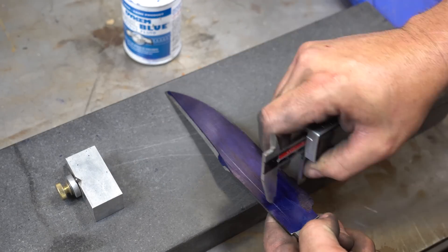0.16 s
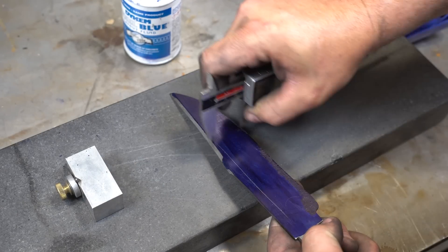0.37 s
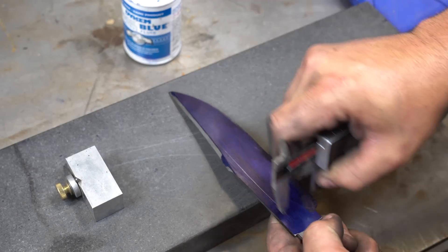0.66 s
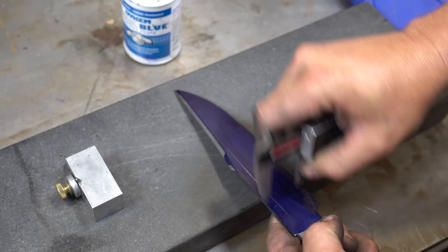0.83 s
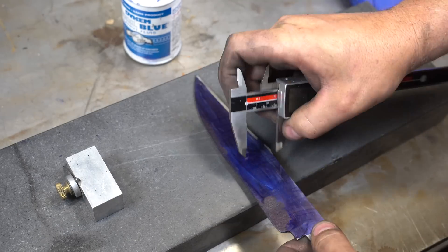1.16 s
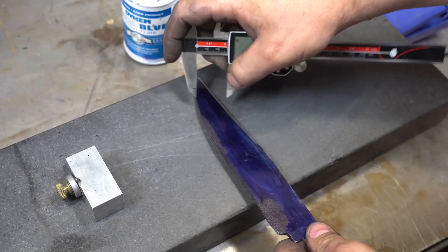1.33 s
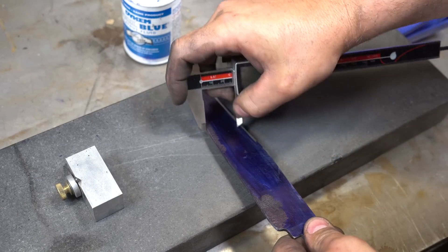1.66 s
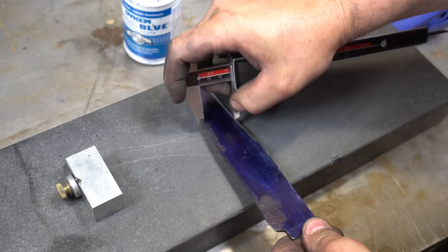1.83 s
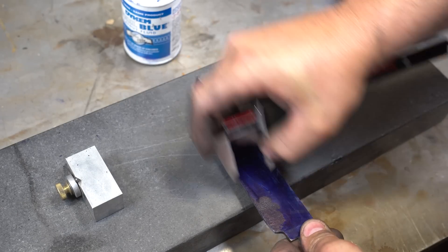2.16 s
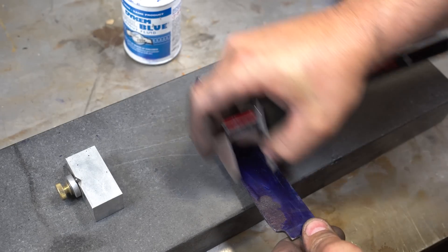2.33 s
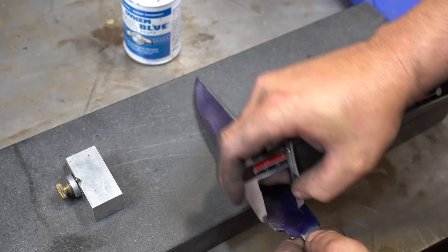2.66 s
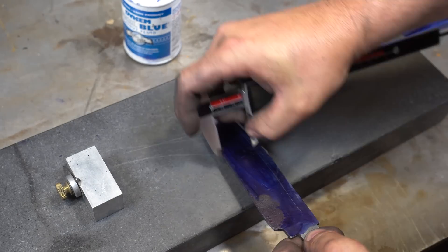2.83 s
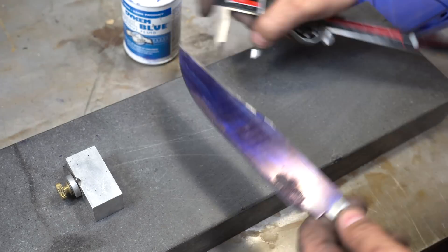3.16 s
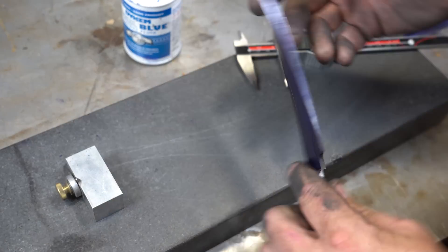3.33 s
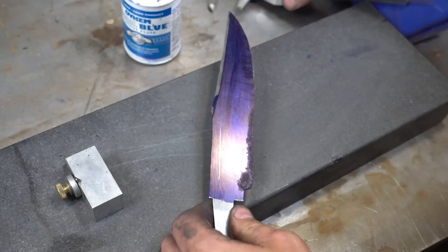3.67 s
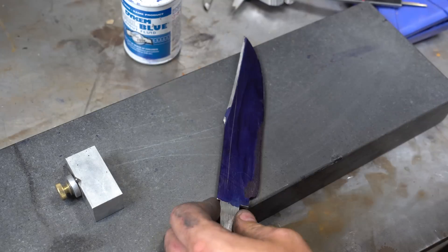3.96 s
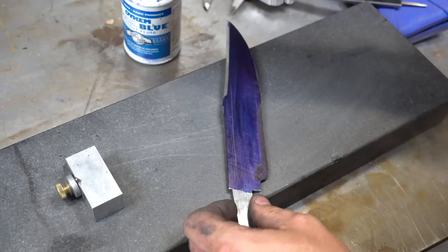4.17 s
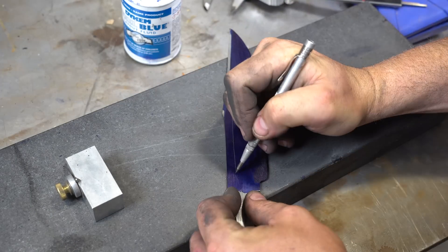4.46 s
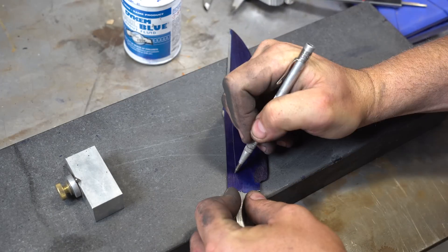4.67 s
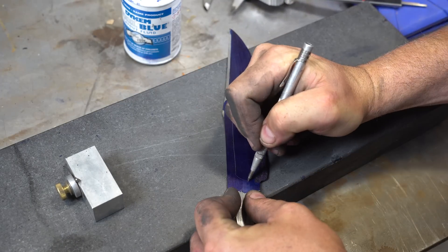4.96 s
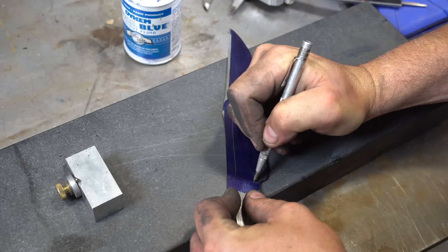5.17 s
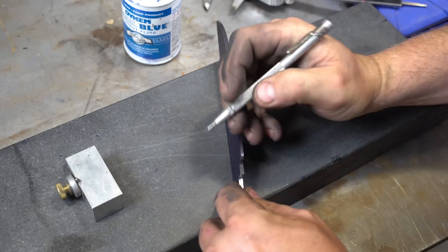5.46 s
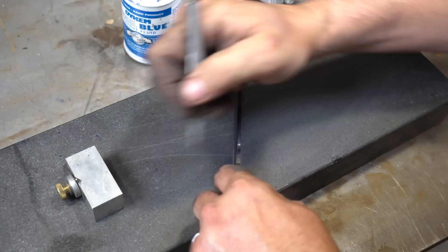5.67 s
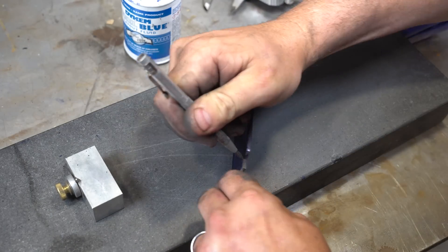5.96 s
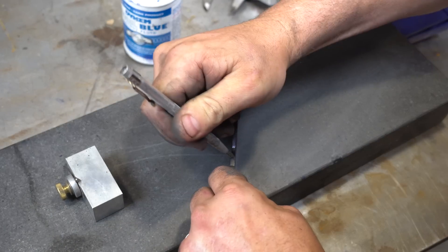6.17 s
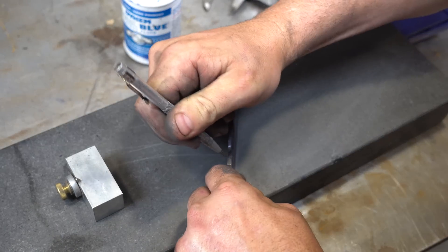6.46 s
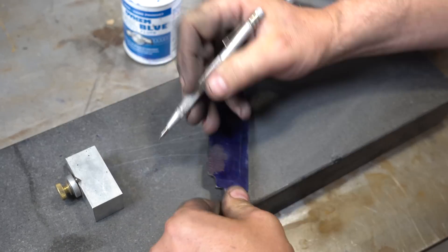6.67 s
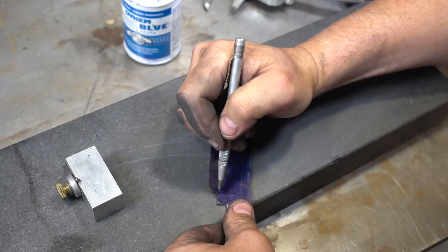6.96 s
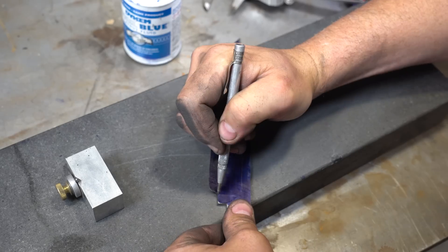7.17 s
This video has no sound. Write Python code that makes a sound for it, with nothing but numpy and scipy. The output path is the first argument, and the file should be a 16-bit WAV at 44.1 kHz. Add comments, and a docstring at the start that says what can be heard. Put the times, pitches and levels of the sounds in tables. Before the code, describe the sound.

Dry, bright metal scratching in quick back-and-forth runs, then clinks, a hard blade slap on stone, short scrapes and sharp steel ticks over a faint fan.

```python
"""Quick runs of dry scratching, clinks and a hard slap, over the steady whir of a workshop fan.
Close to the microphone pair, a little right of centre, a caliper jaw scratches a dyed knife blade on a stone
plate: tiny random slips drive resonances. The caliper is put down, the blade is laid flat and slid about, and
a steel scribe pricks and taps it: bursts of noise with dying modes. Near the end a distant motor swells,
made of wavering tones and a soft rush of noise."""
import sys
import numpy as np
from scipy import signal
from scipy.fft import rfft, irfft
from scipy.io import wavfile
from scipy.ndimage import uniform_filter1d

SR = 44100
rng = np.random.default_rng(int(sys.argv[2]) if len(sys.argv) > 2 else 0)


def to_wav(s):
    """Save 16-bit WAV."""
    ch = np.atleast_2d(s).T  # columns
    pcm = np.round(np.clip(ch, -1, 1) * 32767)  # PCM
    wavfile.write(sys.argv[1], SR, pcm.astype(np.int16))


N = 321930
TIME = np.arange(N) / SR

# The shop, at a distance.
# fan noise, shape only: (frequency [Hz], density [dB per Hz])
FAN_SPECTRUM = [(30, -52), (60, -47), (110, -33.5), (200, -34.5), (310, -31), (450, -22.5), (750, -22),
                (1050, -12.5), (1500, -10.5), (2400, 2), (3500, -5.5), (5500, -9.5), (7500, -11.5),
                (11000, -14), (16000, -18)]
FAN_DB = -63  # rms of the fan noise
# hum of the fan: (frequency [Hz], mean level [dB])
FAN_TONES = [(120, -119), (248.5, -99), (479.5, -86), (958, -101)]
# fuzzy whistles of the fan: (frequency [Hz], width of each of two passes [Hz], level [dB])
FAN_WHISTLES = [(2472, 29, -72), (2983, 62, -79.5), (5880, 1300, -74)]
# overall level of the distant motor: (time [s], level [dB])
MOTOR_LEVEL = [(6.5, -105), (6.8, -76), (7.0, -74.5), (7.14, -74), (7.22, -70), (7.3, -68.5)]
# tones of the motor: (multiple of its hum [-], relative level idling [dB], relative level under load [dB])
MOTOR_ORDERS = [(3, -20.5, -12), (4, -15, -19), (5, -6, -3.5), (8, -39, -9), (10, 0.5, -7),
                (11.2, -4.5, -3), (13, -35, -8), (15, -6, 4)]
# soft rush around the motor, shape only: (frequency [Hz], level [dB])
MOTOR_RUSH = [(40, -35), (120, -20), (250, -64), (450, 0.5), (750, -9), (1200, 0), (2000, 5), (3500, -17),
              (9000, -12), (16000, -34)]
LOAD_S, LOAD_RISE_S = 7.13, 0.13
# decay of the shop's tail: (frequency [Hz], t60 [s])
ROOM_DECAY = [(200, 0.054), (1500, 0.7), (6000, 0.23), (15000, 0.021)]

# The microphone pair and the place of the work.
# shop sound, from all sides: (frequency [Hz], left-right correlation [-])
FAR_LIKENESS = [(60, 0.58), (200, .98), (400, 0.96), (700, 0.93), (1300, 0.74), (2400, 0.75), (4400, 0.13),
                (15000, 0.16)]
# work sound, close by: (frequency [Hz], left-right correlation [-])
NEAR_LIKENESS = [(100, 0.94), (500, .997), (1000, 1), (2200, 1), (4000, 0.8), (8000, 0.67), (14000, 0.67)]
# the work lies to the right: (frequency [Hz], right minus left [dB])
RIGHTWARD = [(1500, -2), (2500, 1), (5000, 0), (10000, 2.5), (16000, 2.5)]
EDGE_HZ = 15900  # upper edge of the recorder's band

# Blows, all as (time [s], level before the group's gain [dB], treble relative to level [dB],
# body relative to level [dB], t60 of the crack [s]); fingers on the thing shorten the crack.
# scribe and blade clink; columns as above
STEEL_TAPS = [(.7669, -38.5, 5, -38, 0.015), (.7971, -37, -7, -41, 0.016), (1.0609, -38.5, 5, -12, 0.019),
              (1.0675, -40.5, -14, -13.5, 0.066), (3.8538, -36.5, 2, -21.5, 0.015),
              (5.3997, -34.5, -2.5, -24, 0.027), (6.5489, -53, -14, -12, 0.064),
              (6.7085, -32, 1, -17, 0.018), (6.7731, -34.5, -3, -23, 0.0091),
              (6.826, -52.5, -4, -13, 0.051), (6.9251, -41.5, 2, -28, 0.016)]
# the blade is rolled up on its edge; columns as above
EDGE_KNOCKS = [(5.5761, -40.5, -21, -16.5, 0.011), (5.618, -50.5, -13, -5.5, 0.025),
               (5.6466, -38, -11.5, -15.5, 0.028), (5.6585, -47, -12, -10, 0.071),
               (5.6898, -46, -23, -8, 0.0074)]
# the caliper slips off and lands; columns as above
CALIPER_KNOCKS = [(.3028, -54, 9, -4.5, 0.032), (.9675, -63, 2, -25, .03), (1.188, -59.5, 2, -31, 0.049),
                  (1.4368, -53.5, 3, -6.5, 0.036), (3.097, -46, 11, -4, 0.015),
                  (3.1005, -33, -7, -19.5, 0.0093), (3.1041, -37, -12, -11, 0.1),
                  (3.1262, -44, 5.5, -8.5, 0.036), (3.2476, -42, 2, -15, 0.014),
                  (3.2571, -35.5, 8, -17.5, 0.0054), (3.2648, -46, -5, -3.5, 0.086),
                  (3.274, -36, 5, -14, 0.012), (3.281, -46, 4, -11, 0.15), (3.314, -36, 9, -12.5, 0.011),
                  (3.3201, -40, 3, -1, 0.037), (3.329, -43, -2, -4, 0.021), (3.3347, -35.5, 5.5, -8, 0.073),
                  (3.364, -45.5, 2.5, -18, .016), (3.381, -55.5, -7, 0.5, 0.053),
                  (3.5575, -58.5, 13, 2, .012), (3.5695, -53.5, 17.5, -10, 0.018),
                  (3.584, -53, -0.5, -7.5, 0.36), (3.595, -61, 19, -1, 0.037)]
# the blade slaps on the stone and settles; columns as above
BLADE_DROPS = [(3.6952, -17.5, -2.5, -9, 0.027), (3.7056, -10.5, -4.5, -14, 0.027),
               (3.717, -31, 1, -5, 0.08), (3.728, -31, 1, -6, 0.065), (3.739, -28.5, -10, -20, 0.032),
               (3.7575, -38, -1, -10, 0.042), (3.9327, -35, -4, -13, 0.034), (4.0856, -52, 6, -19, 0.029)]
# the scribe's point catches and jumps; columns as above
POINT_SLIPS = [(4.695, -57, -12, -23, 0.019), (5.096, -54, -1, -27, 0.025), (5.109, -46, -3, -13.5, .02),
               (5.116, -36.5, -6, -18.5, 0.042), (5.211, -62, -10, -13, .015),
               (5.221, -45.5, 0, -18.5, 0.062), (5.2275, -41.5, -5, -22, 0.025)]
POINT_THUD_DB = -1.5  # the full weight of the hand comes down behind the point
HARD_BLOW_DB, THUD_GROWTH = -39.5, 0.38  # a softer blow loses its thud by so many dB per dB
# uneven ticks, as the blade is rolled on edge and the scribe feels for its place:
# (start [s], end [s], count [-], mean level before gain [dB], treble relative to level [dB])
RATTLES = [(5.584, 5.734, 24, -59.5, -13), (6.327, 6.479, 9, -58.5, -11)]
# the jaw springs off the blade's edge: (time [s], level of the ping [dB], pitch [Hz])
JAW_SNAPS = [(3.1009, -14.5, 12900), (3.1035, -11, 8480)]
SNAP_RISE_S, SNAP_RING_DB, SNAP_RING_T60 = 0.00027, -7, 0.018

# Modes of the things struck, all as (frequency [Hz], relative level [dB], t60 [s]).
# scribe and blade in the hand; columns as above
STEEL_MODES = [(1230, -5.5, 0.066), (4120, 4, 0.055), (4480, 0, 0.04), (5230, 0, 0.04), (6750, 7, 0.06),
               (7800, 3, .06), (8600, 4, .06), (10420, 8, 0.045), (12700, 8, 0.035), (14200, -3, 0.022)]
# blade on its edge; columns as above
EDGE_MODES = [(1223, -10, 0.39), (1970, 1, 0.083), (2750, -17, 0.044), (3814, 3, 0.088), (4210, 9, 0.054),
              (4440, 0, 0.023), (5210, 7, 0.029), (6450, -7, 0.059), (8300, -14, 0.039), (10200, 2, 0.042)]
# caliper as it is knocked; columns as above
CALIPER_MODES = [(1170, -7, .05), (1380, -1, .06), (1650, -7, .05), (1980, -4, .05), (2850, -8, .04),
                 (3650, -9, .04), (4140, 0, .07), (7300, 2, .07), (7750, 0, .06), (8400, -5, .03),
                 (10300, -3, .06), (11450, -2, .04), (12600, -1, .03), (13350, -2, .06), (14400, -3, .03)]
# frame of the caliper on its back; columns as above
FRAME_MODES = [(470, -18, .04), (1380, -2, .04), (1650, -8, .03), (2900, -12, .02), (7330, 0, .035),
               (7750, -3, .03), (10200, -9, .03), (13400, -8, .03)]
# blade flat on the stone; columns as above
FLAT_BLADE_MODES = [(1120, -3, .08), (1400, -5, .07), (1680, -5, .06), (2150, -2, .05), (2800, 0, .06),
                    (3075, 0, .07), (3930, 1, .07), (4430, -3, .07), (5280, -3, .09), (5650, -1, .08),
                    (6050, -2, .1), (6345, -4, .12), (8780, -6, .06)]
# scribe's point; columns as above
POINT_MODES = [(1520, -8, 0.055), (4180, -7, 0.045), (7060, 10.5, 0.012), (7880, 5.5, 0.015),
               (8720, 9.5, 0.015), (10300, 0, 0.028)]
# bench below; columns as above
BENCH_MODES = [(257, -4.5, 0.48), (448.2, 20, 0.19), (620, 18.5, 0.086)]
# stone plate; columns as above
PLATE_MODES = [(462, 13, 0.17), (615, 23, 0.089), (677, 24, 0.076)]
ROCK_START_S, ROCK_S, ROCK_DB = 3.409, 0.028, -48.5  # first touch, spacing, level of the first touch

# shoves of the blade over the stone: (start [s], length [s], level [dB], relative speed [-])
SHOVES = [(3.919, 0.054, -47.5, 0.76), (3.965, 0.026, -46, 0.69), (4.002, 0.054, -47, 0.75),
          (4.075, 0.011, -48, 0.95), (4.128, 0.033, -46.5, 1.04), (4.202, 0.021, -41, 1.9),
          (4.264, 0.03, -47, 0.63), (4.325, 0.018, -39, 1.4)]
SHOVE_ATTACK_S, SHOVE_RELEASE_DB_PER_S = 0.024, 490
# scrape of stone grains and dye flakes, shape only: (frequency [Hz], level [dB])
GRIT_SPECTRUM = [(60, -81), (300, -69), (900, -48), (1600, -18.5), (2900, 3), (4600, 2), (6500, -2),
                 (8500, -1), (12000, 3.5), (16000, 0)]

# hiss of the jaw, shape only: (frequency [Hz], level [dB])
JAW_SPECTRUM = [(300, -80), (900, -63.5), (1500, -5.5), (2000, -8.5), (3300, -7.5), (5200, -10.5),
                (6300, -13.5), (7100, 0), (7700, -7.5), (8700, 2), (10500, -2.5), (12500, 6), (14800, 4),
                (16000, -0.5)]
# resonances of the blade under the jaw: (frequency [Hz], width of each of two passes [Hz], level [dB])
BLADE_RESONANCES = [(2900, 600, 8), (3650, 400, 7), (4130, 330, 13.5), (6030, 380, 11), (7150, 650, 16.5),
                    (8250, 1500, 13.5), (10420, 720, 10), (12600, 700, 11), (15200, 400, 11)]
# how freely the blade rings under the jaw: (time [s], ring relative to the hiss [dB])
CONTACT = [(.28, -5.5), (.56, -11), (.64, -4), (.75, 9), (.835, 0), (1.45, -29), (2.1, -12.5), (2.65, -4),
           (3.05, -13.5)]
# runs of the jaw, to and fro: (start [s], end [s], strokes [-], slowing (below 0: hurrying) [-],
# first stroke [dB], last stroke [dB], chatter of the last pull [dB], base chatter pitch [Hz])
RUNS = [(0.097, 0.297, 2, -0.013, -39.5, -35.5, -54.5, 1820),
        (0.392, 0.537, 4, -0.12, -54.5, -49, -49, 1690), (0.658, 0.813, 5, 0.044, -45, -35.5, -47, 3350),
        (1.735, 2.448, 18, 0.14, -49, -35.5, -45.5, 1610), (2.494, 2.794, 7, -0.26, -35, -38, -52, 1700),
        (2.914, 3.11, 2, 0.36, -37, -39, -50.5, 1630)]
# single pulls of the jaw, and at 1.21 s a faint rub of the hand made the same way: (start [s], length before
# lingering [s], hiss [dB], chatter [dB], base chatter pitch [Hz])
PULLS = [(-.02, 0.065, -35, -50.5, 1760), (.25, 0.083, -54.5, -52.5, 1790), (.375, 0.026, -54.5, -77, 1600),
         (.527, 0.11, -44, -53, 1690), (.585, 0.075, -43, -48.5, 3000), (.819, 0.035, -20, -47, 1260),
         (.852, 0.016, -29.5, -49, 1160), (1.21, 0.094, -65, -74, 1130), (1.442, 0.059, -54, -56, 1410),
         (1.621, 0.038, -47.5, -55.5, 1590), (1.675, 0.05, -61, -69, 1600),
         (2.804, 0.083, -38.5, -53, 2400)]
MOVING_SHARE = 0.93  # of each stroke, before lingering; for the rest the hand is turning round
SETTLING = 3.3  # power law by which the pressure settles over a run
CHATTER_GROWTH = 0.53  # dB of chatter per dB of hiss
RETURN_HISS_DB, RETURN_CHATTER_DB = -1.5, -14  # on the way back the jaw trails: lighter and much smoother
SIZZLE_HZ, SIZZLE_HZ_PER_S = 11340, 1630  # the sizzle creeps up as the work goes on
STEEP_HZ = 2200  # a steeply held jaw chatters above this pitch, and more broadly
# widths of the chatter, each pass: (jaw held flat [Hz], held steeply [Hz])
CHATTER_WIDTHS_HZ = (640, 1500)


def amp(db):
    """Amplitude factor of a level in dB."""
    return 10 ** (np.asarray(db) / 20)


def unit(x):
    """Scales a signal to rms 1."""
    return x / np.sqrt(np.mean(x ** 2) + 1e-24)


def read(points, hz):
    """Reads a (frequency, value) table along a logarithmic frequency axis."""
    f, value = np.transpose(points)
    return np.interp(np.log(hz + 1), np.log(f + 1), value)


def curve(rows):
    """Draws each column of a table as straight lines over time."""
    s, *columns = np.transpose(rows)
    return [np.interp(TIME, s, c) for c in columns]


def add(mix, s, sound):
    """Mixes a sound in at time s; one that began earlier is joined part-way."""
    sound = sound[..., max(-round(s * SR), 0):]
    part = mix[..., max(round(s * SR), 0):][..., :sound.shape[-1]]
    part += sound[..., :part.shape[-1]]


def colour(x, points):
    """Filters by a spectrum of (Hz, dB) points."""
    n = x.shape[-1]
    gain = amp(read(points, np.fft.rfftfreq(n, 1 / SR)))
    return irfft(rfft(x) * gain, n)


def wander(rate_hz):
    """Smooth random drift of rms 1: noise low-passed near rate_hz."""
    n = 2 ** 14
    hz = np.fft.rfftfreq(n, N / SR / n)
    slow = irfft(rfft(rng.standard_normal(n)) / (1 + (hz / rate_hz) ** 4), n)
    return unit(np.interp(TIME, np.linspace(0, N / SR, n), slow))


def microphone_pair(pair, likeness=NEAR_LIKENESS):
    """Gives two unrelated signals the left-right correlation of a sound at a microphone pair."""
    n = pair.shape[-1]
    same = np.clip(read(likeness, np.fft.rfftfreq(n, 1 / SR)), 0, 1)
    mid, side = rfft(pair) * np.sqrt([(1 + same) / 2, (1 - same) / 2])
    return irfft([mid + side, mid - side], n)


def resonate(x, hz, width):
    """A resonance, of gain 1 at its centre, that can follow a pitch curve."""
    turn = np.exp(2j * np.pi * np.cumsum(hz * np.ones(N)) / SR)
    r = np.exp(-np.pi * width / SR)
    return 2 * (turn * signal.lfilter([1 - r], [1, -r], x / turn)).real


def band_ring(x, hz, width):
    """A resonance passed twice for steep skirts."""
    return resonate(resonate(x, hz, width), hz, width)


def fan():
    """Steady air noise with a low hum and a few fuzzy whistles, from all sides."""
    noise = microphone_pair(rng.standard_normal((2, N)), FAR_LIKENESS)
    out = amp(FAN_DB) * unit(colour(noise, FAN_SPECTRUM))
    for hz, db in FAN_TONES:
        tone = np.sin(2 * np.pi * hz * TIME + 0.35 * wander(1.9))
        out += amp(db + 1.2 * wander(10.0)) * unit(tone)
    draught = microphone_pair(rng.standard_normal((2, N)), FAR_LIKENESS)
    for hz, width, db in FAN_WHISTLES:
        out += amp(db) * unit(band_ring(draught, hz, width))
    return out


def motor(hum_hz=112.6, rush_db=6):
    """A far machine in a soft rush: it idles, then takes load, and other multiples of its hum come forward."""
    load = np.clip((TIME - LOAD_S) / LOAD_RISE_S, 0, 1)
    lines = np.zeros(N)
    for k, idle_db, load_db in MOTOR_ORDERS:
        tone = np.sin(2 * np.pi * k * hum_hz * TIME + 0.08 * k * wander(12))
        lines += amp(idle_db + (load_db - idle_db) * load + 2.5 * wander(15)) * unit(tone)
    noise = microphone_pair(rng.standard_normal((2, N)), FAR_LIKENESS)
    rush = amp(rush_db) * unit(colour(noise, MOTOR_RUSH))
    return amp(curve(MOTOR_LEVEL)[0]) * (lines + rush)


def room(x, near_db=-13, near_t60=0.18, far_db=-21):
    """Quick reflections from plate, hands and bench, then the faint tail of the shop, as decaying noise."""
    noise = microphone_pair(rng.standard_normal((2, SR // 2)), FAR_LIKENESS)
    hz, t, z = signal.stft(noise, SR, nperseg=256)
    far = signal.istft(z * amp(-60 * t / read(ROOM_DECAY, hz)[:, None]), SR, nperseg=256)[1]
    t = np.arange(far.shape[1]) / SR
    near = microphone_pair(rng.standard_normal(far.shape)) * amp(-60 * t / near_t60) * (t > .002)
    echo = amp(near_db) * unit(near) + amp(far_db) * unit(far * (t > .01))
    return signal.fftconvolve(x, echo / np.sqrt(len(t)), axes=1)[:, :N]


def ringing(modes, t, loose_db=2.0, split=0.026, count=8, crowd_hz=50):
    """Dying modes, each a close cluster; every blow lands elsewhere and so weighs them anew."""
    hz, db, t60 = np.repeat(modes, count, 0).T[:, :, None]
    phase, weight, detune, left, right = rng.standard_normal((5, len(hz), 1))
    mode_hz = hz + (split * hz + crowd_hz) * detune
    decay = amp(db + loose_db * weight - 60 * t / t60)
    waves = decay * np.exp(2j * np.pi * (mode_hz * t + phase))
    skew = np.array([left, right]) * hz / 22000  # treble reaches the two microphones out of step
    return (np.exp(1j * skew[..., 0]) @ waves).real / np.sqrt(count)


def early(x, lo_hz, hi_hz, seconds):
    """One band of a blow, both channels scaled so that their mean has rms 1 over its first moments."""
    band = signal.butter(3, [lo_hz, min(hi_hz, .49 * SR)], "band", fs=SR, output="sos")
    x = signal.sosfilt(band, x)
    return x / np.sqrt(np.mean(x.mean(0)[:round(seconds * SR)] ** 2) + 1e-24)


def blows(rows, modes, ring_db, gain_db, clink_hz, snap_db, thud_db, base=BENCH_MODES, push_db=-50,
          thud_t60=0.0096, snap_t60=0.0028):
    """A snap and short crack of contact, the modes of the thing struck, and a thud in the base below."""
    out, t = np.zeros((2, N)), np.arange(SR // 6) / SR
    for s, level_db, treble_db, body_db, crack_t60 in rows:
        noise = microphone_pair(rng.standard_normal((2, len(t))))
        contact = noise * (amp(-60 * t / crack_t60) + amp(snap_db - 60 * t / snap_t60))
        blow = contact + amp(ring_db) * ringing(modes, t)
        thud = ringing(base, t, loose_db=1, crowd_hz=4, count=1)
        thud = thud + 12 * noise * amp(-60 * t / thud_t60)
        softness_db = THUD_GROWTH * min(level_db + body_db - HARD_BLOW_DB, 0)
        clink = early(blow, clink_hz, 9000, .006) + amp(treble_db) * early(blow, 9000, 16000, .006)
        body = early(blow, 900, 3000, .008)
        body += amp(thud_db + softness_db) * early(thud, 200, 800, .016)
        body += amp(push_db) * early(thud, 25, 90, .016)
        add(out, s, amp(level_db + gain_db) * (clink + amp(body_db) * body))
    return out


def rattling(spread_db=3.0, body_db=-16, t60=0.044):
    """Rows for blows(): faint steel ticks at uneven moments and of uneven strength."""
    rows = []
    for start, end, count, level_db, treble_db in RATTLES:
        for k in range(round(count)):
            s = start + (end - start) * (k + rng.random()) / round(count)
            rows.append((s, level_db + spread_db * rng.standard_normal(), treble_db, body_db, t60))
    return rows


def rocking(rise_s=0.0031, fade_db=0.8, count=4):
    """The caliper, once down, rocks on its back: each soft touch rings its frame, a little louder each time."""
    out, t = np.zeros((2, N)), np.arange(SR // 8) / SR
    for k in range(count):
        touch = np.minimum(t / rise_s, 1) * ringing(FRAME_MODES, t, loose_db=1.5, split=.03)
        add(out, ROCK_START_S + k * ROCK_S, amp(ROCK_DB + k * fade_db) * touch)
    return out


def snaps():
    """The jaw's tip springs free: a ping of a few cycles that swells and collapses, and a brief ring with it."""
    out, t = np.zeros((2, N)), np.arange(SR // 20) / SR
    for s, db, hz in JAW_SNAPS:
        u = t / SNAP_RISE_S
        ping = (u * np.exp(1 - u)) ** 3 * np.sin(2 * np.pi * hz * t)
        ring = ringing([(hz, SNAP_RING_DB, SNAP_RING_T60)], t, loose_db=1.0, split=.04)
        add(out, s, amp(db) * (ping + np.minimum(u, 1) * ring))
    return out


def friction(slips_per_s, spread_db, smooth, body_t60=0.012, low_hz=650, shift_hz=25, count=4):
    """Tiny unequal slips over an even rub ring crowded modes of thin steel that change as the contact travels."""
    size = amp(spread_db * np.minimum(rng.exponential(1, N), 4)) * (rng.random(N) < slips_per_s / SR)
    slips = unit(size * rng.standard_normal((2, N)))
    rub = microphone_pair(slips + smooth * rng.standard_normal((2, N)))
    t = np.arange(SR // 50) / SR
    bodies = rng.standard_normal((count, 1, len(t))) * amp(-60 * t / body_t60)
    places = np.array([wander(shift_hz) for _ in range(count)])
    places /= np.linalg.norm(places, axis=0)
    rung = np.zeros((2, N))
    for place, body in zip(places, bodies):
        rung += place * signal.oaconvolve(rub, body, axes=1)[:, :N]
    rub = unit(rub) + amp(-4.5) * unit(rung)
    return unit(signal.sosfilt(signal.butter(2, low_hz, "high", fs=SR, output="sos"), rub))


def shoving():
    """Level and speed of the sliding blade: each shove starts quickly, holds, and coasts to a stop."""
    level = np.zeros(N)
    for start, length, db, _ in SHOVES:
        release_db = SHOVE_RELEASE_DB_PER_S * np.maximum(TIME - start - length, 0)
        level += np.clip((TIME - start) / SHOVE_ATTACK_S, 0, 1) * amp(db - release_db)
    speed, = curve([(start + length / 2, speed) for start, length, _, speed in SHOVES])
    return level, speed


def sliding(dulling=3.26, rasp_hz=8200, rasp_db=-1, hiss_db=8.5, grumble_db=-35.0, drag_db=-17):
    """Steel rides over the stone's grain; its rasp wanders, and a slow slide loses its hiss and grumbles."""
    level, speed = shoving()
    grains = friction(slips_per_s=5000, spread_db=2.0, smooth=0.9)
    grumble = unit(band_ring(grains, 3200 * speed ** 0.3 * amp(0.9 * wander(40)), 1700))
    grumble = grumble * amp(1.3 * wander(60))
    drag = unit(band_ring(grains, 1900 * speed ** 0.5 * amp(0.8 * wander(70)), 950)) / speed
    rasp = unit(band_ring(grains, rasp_hz * amp(1.3 * wander(18)), 2500))
    hiss = amp(hiss_db) * unit(colour(grains, GRIT_SPECTRUM)) + amp(rasp_db) * rasp
    hiss *= np.minimum(speed, 1) ** dulling
    flutter = amp(0.9 * wander(90) + 0.9 * wander(500))
    return level * flutter * (hiss + amp(grumble_db) * grumble + amp(drag_db) * drag)


def strokes():
    """All strokes, with the hand's faint rub, as (start, length, hiss dB, chatter dB, chatter Hz); in runs,
    pulls and returns alternate."""
    rows = list(PULLS)
    for start, end, count, slowing, first_db, last_db, chatter_db, chatter_hz in RUNS:
        count = round(count)
        u = np.linspace(0, 1, count + 1)
        turns = start + (end - start) * (u + slowing * u * (u - 1))
        period = np.diff(turns)
        back = np.arange(count) % 2  # 1 on the way back
        press_db = (first_db - last_db) * np.linspace(1, 0, count) ** SETTLING
        starts = turns[:-1] + period * (1 - MOVING_SHARE) / 2
        hiss_db = last_db + press_db + back * RETURN_HISS_DB
        judder_db = chatter_db + CHATTER_GROWTH * press_db + back * RETURN_CHATTER_DB
        rows += zip(starts, period * MOVING_SHARE, hiss_db, judder_db, np.full(count, chatter_hz))
    return rows


def stroke_curves(edge=0.42, linger=0.1):
    """Hiss and speed, then chatter and level-weighted pitch (flat, steep): strokes speed up and slow down."""
    hiss, speed = np.zeros((2, N))
    chatter, weighted_pitch = np.zeros((2, 2, N))
    for start, length, hiss_db, chatter_db, hz in strokes():
        u = np.arange(round(length * (1 + 2 * linger) * SR)) / (length * SR) - linger
        ramp = np.clip((np.minimum(u, 1 - u) + linger) / (edge + linger), 0, 1)
        push = np.sin(np.pi / 2 * ramp) ** 2
        judder = amp(chatter_db) * push * (2.0 - 1.33 * push)  # strongest at moderate speed
        steep = int(hz > STEEP_HZ)
        begin = start - linger * length
        add(hiss, begin, amp(hiss_db) * push)
        add(speed, begin, push)
        add(chatter[steep], begin, judder)
        add(weighted_pitch[steep], begin, hz * judder)
    return hiss, speed, chatter, weighted_pitch


def scratching(arch_hz=170, sizzle_db=-4, stray_hz=80, bite_db=-12, bite_hz=6200, flakes_db=-13):
    """The jaw's slips hiss and sizzle, ring the blade, chip off flakes of dye and chatter."""
    hiss, speed, chatter, weighted_pitch = stroke_curves()
    ring_db, = curve(CONTACT)
    slips = friction(slips_per_s=4500, spread_db=2.5, smooth=1.0)
    ring = np.zeros((2, N))
    for hz, width, db in BLADE_RESONANCES:
        ring += amp(db + 1.5 * wander(14)) * band_ring(slips, hz, width)
    sizzle_hz = SIZZLE_HZ + SIZZLE_HZ_PER_S * TIME + 700 * wander(25)
    sizzle = unit(band_ring(slips, sizzle_hz, 2800))
    bite = band_ring(slips, bite_hz * amp(1.3 * wander(16)), 2400)
    bite = unit(bite) * amp(2.5 * wander(14))
    flakes = unit(colour(friction(slips_per_s=260, spread_db=3.0, smooth=0), GRIT_SPECTRUM))
    scrape = unit(colour(slips, JAW_SPECTRUM)) + amp(sizzle_db) * sizzle
    scrape += amp(bite_db) * bite + amp(flakes_db) * flakes + amp(ring_db) * unit(ring)
    scrape /= 1 + amp(ring_db)
    roughness = amp(0.7 * wander(130) + 1.2 * wander(600))
    out = amp(-5.0) * hiss * scrape * roughness
    catches = friction(slips_per_s=2500, spread_db=0.5, smooth=0.6, body_t60=0.003)
    for level, weighted_hz, width in zip(chatter, weighted_pitch, CHATTER_WIDTHS_HZ):
        hz = uniform_filter1d(np.maximum(weighted_hz / (level + 1e-12), 1100), size=300)
        hz = hz + arch_hz * speed + stray_hz * wander(46)  # pitch arches up with speed
        out += amp(-2.5) * level * unit(band_ring(catches, hz, width))
    return out


def scene():
    """The work on the plate, close and mostly a little right of centre, in the hum of the shop."""
    work = scratching()
    work += blows(STEEL_TAPS, STEEL_MODES, ring_db=-19, gain_db=-3.5, clink_hz=3820, snap_db=-7.0,
                  thud_db=-15.0)
    work += blows(EDGE_KNOCKS + rattling(), EDGE_MODES, ring_db=-13, gain_db=-4.0, clink_hz=3300,
                  snap_db=-10, thud_db=-20)
    work += blows(CALIPER_KNOCKS, CALIPER_MODES, ring_db=-9.0, gain_db=-2.0, clink_hz=4200, snap_db=-9.5,
                  thud_db=-9.5)
    work += snaps() + rocking()
    work += blows(BLADE_DROPS, FLAT_BLADE_MODES, ring_db=-13.5, gain_db=-13.5, clink_hz=3020, snap_db=-1,
                  thud_db=-20, base=PLATE_MODES)
    work += blows(POINT_SLIPS, POINT_MODES, ring_db=-4.0, gain_db=-3.0, clink_hz=3640, snap_db=-13,
                  thud_db=POINT_THUD_DB)
    lean_db = read(RIGHTWARD, np.fft.rfftfreq(N, 1 / SR))
    work = irfft(rfft(work) * amp([-lean_db / 2, lean_db / 2]), N)
    work += sliding()  # the blade slides in the middle
    return work + room(work) + fan() + motor()


def record(dry):
    """The recorder's band limit: a steep low-pass."""
    low_pass = signal.firwin(401, EDGE_HZ, window=("kaiser", 8), fs=SR)
    return signal.oaconvolve(dry, low_pass[None], "same")


dry = scene()
out = record(dry)
to_wav(out)
```